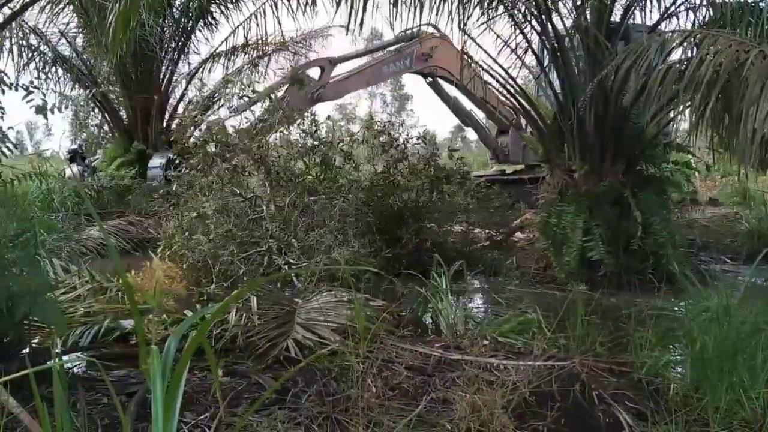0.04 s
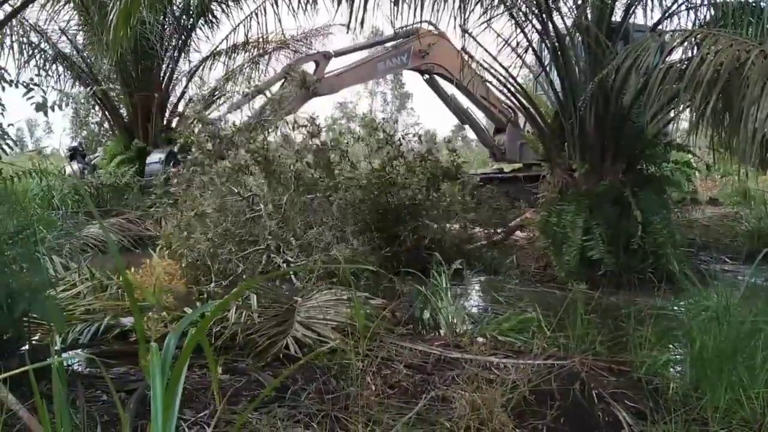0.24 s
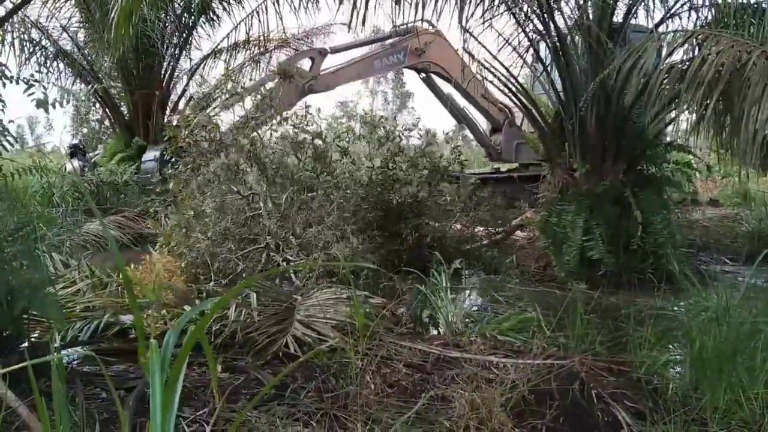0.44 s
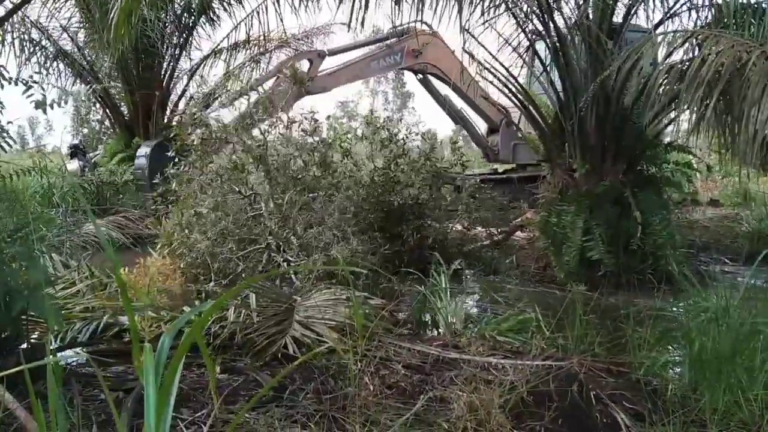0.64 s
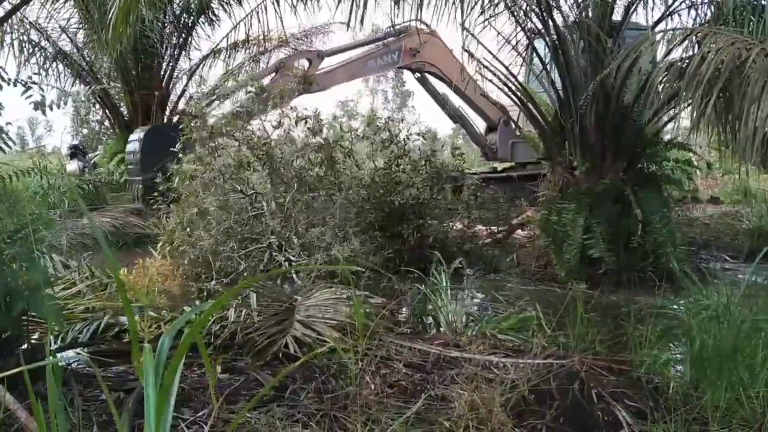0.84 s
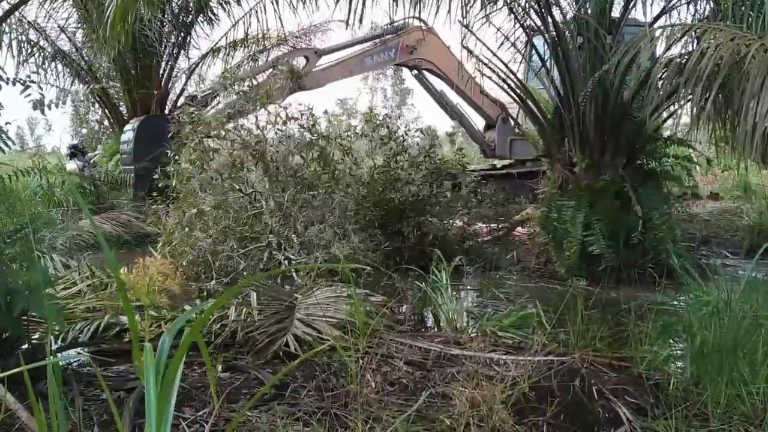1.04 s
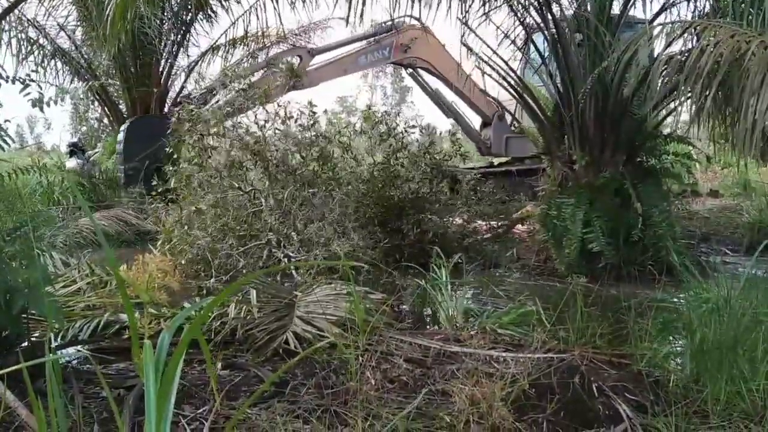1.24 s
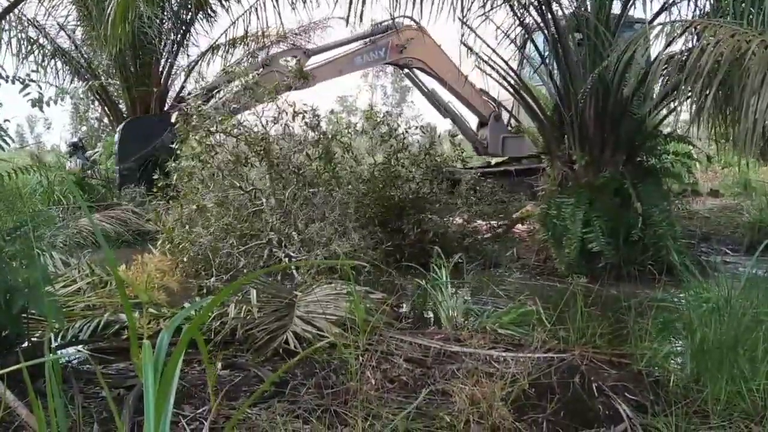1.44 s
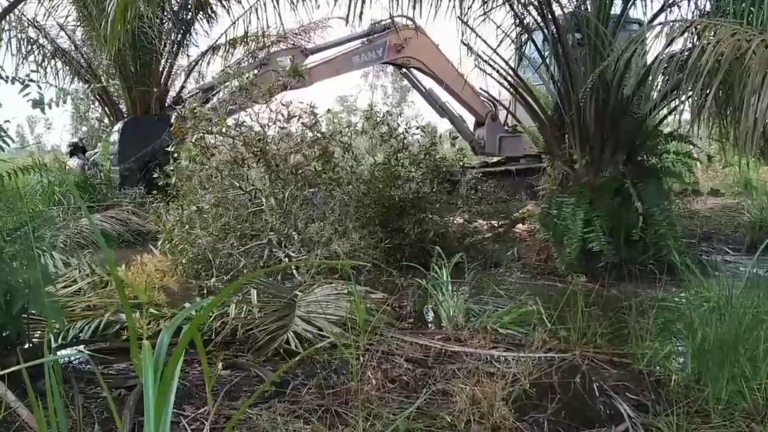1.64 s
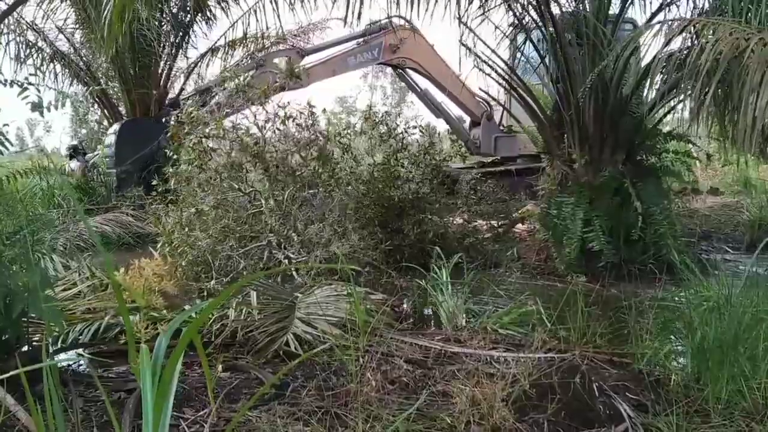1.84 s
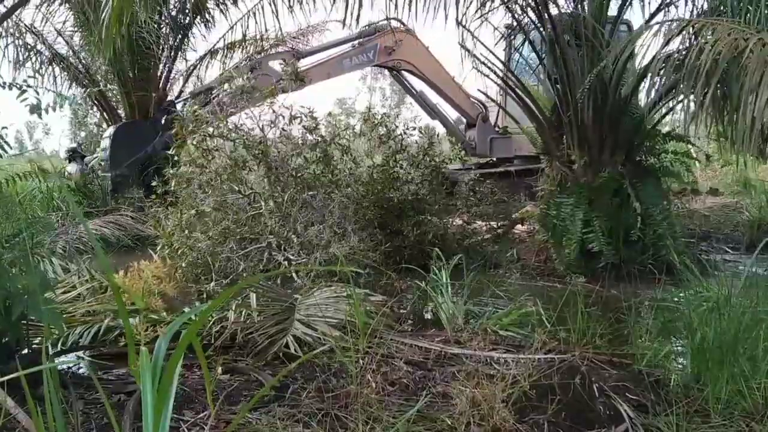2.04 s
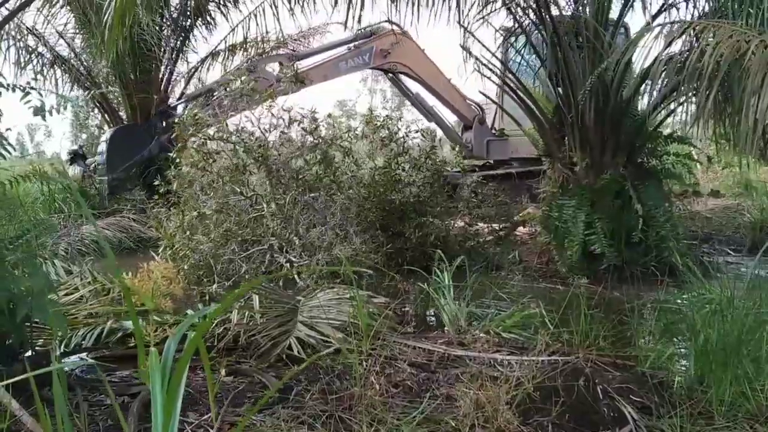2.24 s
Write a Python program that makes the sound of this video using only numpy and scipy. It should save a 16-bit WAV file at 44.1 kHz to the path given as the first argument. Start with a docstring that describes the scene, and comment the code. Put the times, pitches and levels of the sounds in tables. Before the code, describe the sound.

An excavator's steel bucket clanks and booms repeatedly over a diesel hum and hydraulic drone, some way off outdoors. Wet brush rustles and water plops, then the bucket thuds down, wood splinters and two more clanks follow.

```python
"""An excavator swings its arm over flooded ground among palms, some way off.
From the start the diesel hums, the hydraulics drone and wet brush rustles and spatters. At 0.2 s the
steel bucket and linkage begin to clank, each impact exciting their normal modes; air pockets ring in the
water, a twig snaps close by and heavy blows boom. From 0.7 s dry pins squeak. At 1.5 s the bucket lands
with a thud and wood splinters; near 1.9 s it clanks twice more as the engine takes up load."""
import sys
import numpy as np
from scipy import signal
from scipy.fft import rfft, irfft
from scipy.io import wavfile

SR = 44100
rng = np.random.default_rng(int(sys.argv[2]) if len(sys.argv) > 2 else 0)


def int16_out(signal):
    """Quantize to a 16-bit WAV file."""
    q = np.round(np.clip(np.atleast_2d(signal).T, -1, 1) * 32767)
    wavfile.write(sys.argv[1], SR, q.astype(np.int16))


N = 101429
TIME = np.arange(N) / SR
BAND_EDGES_HZ = 22 * 2 ** (np.arange(30) / 3)

# Outdoor air: (frequency [Hz], band level [dB])
AIR_SPECTRUM = [(100,-80.5),(1200,-112),(2200,-81.5),(4000,-89),(7800,-94.5),(10500,-82.5),(15000,-64)]
# Exhaust tones: (multiple of the firing rate [1], level [dB])
EXHAUST_ORDERS = [(1,-60),(2,-56.5),(3,-70),(3.5,-71.5)]
# Effect of engine load on overtones and rumble: (time [s], gain [dB])
ENGINE_LOAD = [(0,-4),(.5,-12.5),(.75,-3.5),(1.1,-7.5),(1.8,-3),(2.0,5.5),(2.15,4)]
# Engine rumble: (frequency [Hz], band level [dB])
RUMBLE_SPECTRUM = [(25,-76),(45,-71),(90,-67),(150,-59.5),(210,-87.5),(300,-75.5),(600,-90),(1500,-82.5)]
# Hydraulic drone: (time [s], level [dB])
DRONE_ENVELOPE = [(0,-44),(.15,-45.5),(.3,-33.5),(.7,-39.5),(.98,-36),(1.12,-45),(1.2,-44),(1.3,-46.5),(1.45,-41.5),(1.75,-54.5),(1.9,-32),(2.05,-40),(2.17,-42.5),(2.255,-80.5),(2.29,-37.5)]
# Its resonances: (frequency [Hz], bandwidth [Hz], relative level [dB])
HYDRAULIC_RESONANCES = [(358.6,51,-8.5),(418.7,44.5,-7.5),(448,110,-14.5),(1034,87,-20.5)]
# Rustle of wet brush: (time [s], level [dB])
BRUSH_ENVELOPE = [(0,-59.5),(.07,-61.5),(.19,-52),(.26,-46.5),(.305,-45.5),(.38,-73),(.43,-48),(.53,-58.5),(.6,-67.5),(.65,-57.5),(.87,-56),(.91,-49.5),(.95,-51.5),(1.0,-48.5),(1.16,-55),(1.27,-65.5),(1.37,-67),(1.42,-60),(1.5,-52),(1.62,-77.5),(1.8,-68),(1.9,-56),(2.07,-73.5),(2.25,-98),(2.275,-53),(2.3,-68)]
# Its colour: (frequency [Hz], relative band level [dB])
BRUSH_SPECTRUM = [(1000,-18),(2000,0.5),(3200,-1),(5000,9.5),(7800,15),(10000,8),(15000,9.5)]
# Bucket impacts: (time [s], level [dB], boom centre [Hz], then five relative levels:
# boom [dB], body [dB], clang [dB], crack [dB], sizzle [dB])
BUCKET_CLANKS = [(0.187, -33, 343, -5, -14.5, -21, -9.5, -14),
                 (0.303, -13, 425, -13.5, -0.5, -10.5, -15, -31.5),
                 (0.411, -13.5, 382, -16, -4.5, -8.5, -22, -20.5),
                 (0.456, -20, 320, -10, -10, -25, -18, -23.5),
                 (0.519, -12.5, 455, -28, -7.5, -14.5, -21.5, -39),
                 (0.655, -23, 450, -11, -2.5, -8, -28, -22), (0.683, -25, 421, -15, -13, -9.5, -9.5, -16),
                 (0.726, -31.5, 440, -16, -6.5, -3.5, -7.5, -18.5),
                 (0.819, -28.5, 383, -10.5, -5, -3.5, -11.5, -39),
                 (0.897, -28.5, 392, -2, -15.5, -4, -15, -16),
                 (1.034, -24.5, 346, -7.5, -29.5, -5, -26.5, -44),
                 (1.119, -40.5, 340, -1.5, -40.5, 4.5, -26, -40),
                 (1.343, -37, 418, 4.5, -26, -1, -13.5, -62),
                 (1.44, -41, 434, -12.5, 6.5, -2, -13.5, -21.5),
                 (1.486, -14, 311, -8, -12.5, -10.5, -16, -27),
                 (1.884, -24, 450, -14.5, -1.5, -26, -18.5, -36.5),
                 (1.923, -14, 477, -12, -11.5, -7, -26, -69)]
# Those five ranges: (centre frequency [Hz])
CLANK_RANGES_HZ = [380, 680, 1450, 2500, 4300]
# Normal modes of the bucket: (frequency [Hz], relative level [dB], T60 [s])
BUCKET_MODES = [(278.3,-2.5,1),(320,0.5,0.91),(343.3,3.5,0.97),(388.6,-3,0.93),(418,-1.5,0.98),(454.5,4,0.5),(552,-4,0.42),(619.6,-0.5,0.3),(676.7,-3.5,0.26),(1048,-3.5,0.19),(1450,-8.5,0.099),(1514,-1,0.11),(1756,0.5,0.28),(2550,-9,0.15)]
# Dense clatter of the steel: (frequency [Hz], relative band level [dB])
CLATTER_SPECTRUM = [(150,-27),(230,-25),(320,-12),(430,-8),(600,-14.5),(850,-18),(1150,-10),(1600,-7.5),(2100,-6),(2700,-5),(3500,-7.5),(5000,-13.5),(8000,-8.5),(14000,-22.5)]
# Reverberation among the trees: (frequency [Hz], T60 [s])
TREE_ECHO_T60 = [(250,1),(660,0.47),(1700,0.27),(4500,0.34),(9000,0.043)]
# Air pockets in the water: (time [s], frequency [Hz], level [dB])
AIR_POCKETS = [(0.192,980,-32),(0.325,726,-40),(0.42,610,-35),(0.533,1444,-23.5),(1.039,1518,-25.5),(1.442,1038,-35.5)]
# Breaking wood: (time [s], peak level [dB], centre frequency [Hz], decay time [s])
WOOD_SNAPS = [(.2478,-17.5,4190,0.00012),(.3055,-20.5,1790,0.0021),(0.639,-36,5270,0.005),(1.4915,-20.5,1980,0.009),(1.506,-23.5,1466,0.009),(1.514,-29,2640,0.0018),(1.523,-39,2460,.001)]
# Booms after heavy blows: (time [s], initial pitch [Hz], settled pitch [Hz], level [dB], T60 [s])
HOLLOW_BOOMS = [(.313,470.6,366,-22,0.23), (.455,367.6,295.7,-28.5,0.288), (1.048,354.6,341.2,-28,0.46),
                (1.498,375.5,309.2,-26,0.67), (1.93,464.3,322.8,-31,0.382)]
# Dry pins: (time [s], duration [s], frequency [Hz], level [dB], bandwidth over frequency [1])
PIN_SQUEAKS = [(1.114,0.092,690,-50,0.039),(1.749,.027,450,-47,0.072),(1.829,0.026,1323,-54,0.027),(1.884,0.058,8080,-54.5,.03),(2.07,.1,1364,-58,.05),(0.666,0.072,8390,-51,0.023),(2.12,.13,1098,-56.5,0.13)]
# The bucket's weight landing: (time [s], level [dB])
LANDINGS = [(1.503, -32.5)]
# Microphone response: (frequency [Hz], gain [dB])
MICROPHONE_RESPONSE = [(0,-1.5),(2750,-1),(3150,-3),(3700,-1.5),(8200,-0.5),(9000,-11.5),(9800,-11.5),(12000,-22),(15000,-22)]


def from_db(db):
    """Amplitude ratio of a level in decibels."""
    return 10 ** (np.asarray(db) / 20)


def rms_one(x):
    """Normalisation to unit rms."""
    return x / np.sqrt(np.mean(x ** 2) + 1e-20)


def in_time(rows):
    """Linear interpolation of a curve at every sample."""
    return np.interp(TIME, *np.transpose(rows))


def at_hz(points, hz):
    """Interpolation on a logarithmic frequency axis."""
    frequencies, values = np.transpose(points)
    return np.interp(np.log(hz), np.log(frequencies), values)


def drift(rate_hz):
    """Low-pass filtered noise: a slow random fluctuation of unit rms."""
    step, settling = 40, 2000  # samples
    r = np.exp(-2 * np.pi * step * rate_hz / SR)
    white = rng.standard_normal(N // step + settling + 2)
    slow = signal.lfilter([1], [1, -2 * r, r * r], white)[settling:]
    return np.interp(np.arange(N) / step, np.arange(len(slow)), rms_one(slow))


def band(x, low_hz, high_hz):
    """Band-pass filtering."""
    sections = signal.butter(3, [low_hz, min(high_hz, .45 * SR)], "band", fs=SR, output="sos")
    return signal.sosfilt(sections, x + 1e-18)


def noise_bands():
    """Third-octave analysis of white noise: (centre frequency [Hz], noise of unit rms)."""
    white = rng.standard_normal((2, N + SR // 4))
    return [(np.sqrt(low * high), rms_one(band(white[k % 2], low, high)[-N:]))
            for k, (low, high) in enumerate(zip(BAND_EDGES_HZ, BAND_EDGES_HZ[1:]))]


def resonant_noise(hz, width_hz):
    """Random forcing of two like resonators in series gives narrow-band noise."""
    r = np.exp(-np.pi * width_hz / SR)
    section = [1, 0, -1, 1, -2 * r * np.cos(2 * np.pi * hz / SR), r * r]
    return rms_one(signal.sosfilt([section, section], rng.standard_normal(N + SR // 4))[-N:])


def add(out, start_s, sound):
    """Superposition of a sound from a given time."""
    i = int(max(start_s, 0) * SR)
    out[i:i + len(sound)] += sound[:max(N - i, 0)]


def outdoor_air():
    """Stationary broadband noise forms the ambient floor."""
    return sum(from_db(at_hz(AIR_SPECTRUM, hz)) * noise for hz, noise in noise_bands())


def firing_phase(firing_hz=65.33, wander=0.004):
    """Phase is the integral of frequency, here a slightly wandering firing rate."""
    return 2 * np.pi * np.cumsum(firing_hz * (1 + wander * drift(7.4))) / SR


def diesel(phase):
    """Periodic firing radiates tones at orders of its rate; load lifts the overtones and rumble."""
    load = from_db(in_time(ENGINE_LOAD))
    hum = np.zeros(N)
    for order, db in EXHAUST_ORDERS:
        tone = np.sqrt(2) * np.sin(order * phase + rng.uniform(0, 2 * np.pi))
        hum += from_db(db) * (load if order > 1 else 1) * tone
    rumble = sum(from_db(at_hz(RUMBLE_SPECTRUM, hz)) * noise for hz, noise in noise_bands() if hz < 1600)
    return hum + load * rumble


def hydraulics(phase, throb_depth=0.15):
    """Noise-driven resonances drone, amplitude-modulated at the firing rate."""
    drone = sum(from_db(db) * resonant_noise(hz, width) for hz, width, db in HYDRAULIC_RESONANCES)
    return drone * from_db(in_time(DRONE_ENVELOPE)) * (1 + throb_depth * np.sin(phase))


def wet_brush(ticks_per_s=900, tick_db=-5, full_contact_db=-53.5, thin_below_hz=5620):
    """Shot noise of leaves and droplets over a hiss; lighter contact loses the lower bands."""
    ticks = (rng.random(N) < ticks_per_s / SR) * rng.choice([-1, 1], N)
    ticks = ticks * from_db(2.5 * np.minimum(rng.exponential(1, N), 5))  # uneven strengths
    out, level_db = np.zeros(N), in_time(BRUSH_ENVELOPE)
    for (hz, hiss), low, high in zip(noise_bands(), BAND_EDGES_HZ, BAND_EDGES_HZ[1:]):
        if hz > 900:
            thinning_db = (level_db - full_contact_db) / (1 + (hz / thin_below_hz) ** 10)
            patchy_db = 2.5 * drift(4.7)
            spatter = from_db(tick_db) * rms_one(band(ticks, low, high))
            out += from_db(at_hz(BRUSH_SPECTRUM, hz) + thinning_db + patchy_db) * (hiss + spatter)
    flutter_db = 2.5 * drift(54)
    return rms_one(out) * from_db(level_db + flutter_db)


def clank_db(clank, hz):
    """Excitation spectrum of an impact: the point of contact selects which low modes boom."""
    _, db, boom_hz, *colour = clank
    boom_width_oct = 0.31
    off_centre_db = min(3 * (np.log2(hz / boom_hz) / boom_width_oct) ** 2, 9) if hz < 500 else 0
    return db + at_hz(list(zip(CLANK_RANGES_HZ, colour)), hz) - off_centre_db


def rise_time_s(clank, hard_rise_s=0.003536, hard_hit_db=-14.5, doubling_db=10):
    """The softer a contact, the more slowly its force builds."""
    return hard_rise_s * 2 ** ((hard_hit_db - clank[1]) / doubling_db)


def plate_lag_s(hz):
    """Large plates respond late at low frequencies."""
    return 0.00848 / (1 + (hz / 450) ** 2)


def bucket_ring(ring_db=-12.5, scatter_db=8):
    """Free vibration: every impact excites each damped mode with a strength of its own."""
    out = np.zeros(N)
    for hz, mode_db, t60 in BUCKET_MODES:
        strikes = np.zeros(N)
        for clank in BUCKET_CLANKS:
            lateness, strength = rng.uniform(-1, 1, 2)
            start_s = clank[0] + plate_lag_s(hz) + lateness * rise_time_s(clank) / 2
            strike_db = ring_db + mode_db + clank_db(clank, hz) + scatter_db * strength
            add(strikes, start_s, from_db([strike_db]))
        r, w = from_db(-60 / (t60 * SR)), 2 * np.pi * hz / SR
        ring = signal.lfilter([.5, 0, -.5], [1, -2 * r * np.cos(w), r * r], strikes + 1e-18)
        out += band(ring, hz / np.sqrt(2), hz * np.sqrt(2))
    return out


def contact_resonances(x, count=22, low_hz=700, high_hz=7000, q=18, depth_db=7):
    """Each contact stirs its own series of alternating resonances and antiresonances."""
    for slot, offset in enumerate(rng.random(count)):
        hz = low_hz * (high_hz / low_hz) ** ((slot + offset) / count)
        w, a = 2 * np.pi * hz / SR, from_db(depth_db * (-1) ** slot / 2)
        k, middle = np.sin(w) / (2 * q), -2 * np.cos(w)
        x = signal.lfilter([1 + k * a, middle, 1 - k * a], [1 + k / a, middle, 1 - k / a], x)
    return x


def bucket_clatter(contact_s=0.006, decay_s=0.021, clatter_db=-5.5, echo_db=-2, grain_db=2):
    """A grinding contact and its echo from the trees add in power; the treble echo dies sooner."""
    out, t = np.zeros(N), TIME[:SR // 2]
    grain = rms_one(from_db(grain_db * drift(210)))
    bands = [(hz, noise) for hz, noise in noise_bands() if hz > 120]
    echo_rise = np.minimum(t / contact_s, 1)
    echoes = [echo_rise * from_db(echo_db - 60 * t / at_hz(TREE_ECHO_T60, hz)) for hz, _ in bands]
    release = np.exp(-np.maximum(t - contact_s, 0) / decay_s)
    for clank in BUCKET_CLANKS:
        span = (int(clank[0] * SR) + np.arange(len(t))) % N
        contact = np.minimum(t / rise_time_s(clank), 1) * release * grain[span]
        clatter = np.zeros(len(t))
        for (hz, noise), echo in zip(bands, echoes):
            lag = int(plate_lag_s(hz) * SR)
            gain = from_db(clatter_db + at_hz(CLATTER_SPECTRUM, hz) + clank_db(clank, hz))
            clatter[lag:] += (gain * noise[span] * np.hypot(contact, echo))[:len(t) - lag]
        add(out, clank[0], contact_resonances(clatter))
    return out


def water_plops(rise_s=0.0046, t60=0.069):
    """Bubble resonance: a pocket of air in water rings as a damped oscillator."""
    out, t = np.zeros(N), TIME[:SR // 4]
    for start_s, hz, db in AIR_POCKETS:
        envelope = from_db(db - 60 * t / t60) * np.minimum(t / rise_s, 1)
        add(out, start_s, envelope * np.sin(2 * np.pi * hz * t))
    return out


def twig_snaps(edge_ratio=1.49, tail_db=-21.5, tail_s=0.008):
    """Fracture radiates a noise burst with a faint tail; thicker wood breaks lower and longer."""
    out, t = np.zeros(N), TIME[:SR // 10]
    for start_s, db, hz, decay_s in WOOD_SNAPS:
        envelope = np.exp(-t / decay_s) + from_db(tail_db) * np.exp(-t / tail_s)
        snap = band(rng.standard_normal(len(t)) * envelope, hz / edge_ratio, hz * edge_ratio)
        add(out, start_s, from_db(db) * snap / np.abs(snap).max())
    return out


def bucket_booms(sag_share=0.1028, rise_s=0.0087, waver_db=3, waver_hz=35):
    """A heavy blow leaves a damped tone that sags in pitch; interfering reflections make it waver."""
    out, t = np.zeros(N), TIME[:SR]
    for start_s, start_hz, settled_hz, db, t60 in HOLLOW_BOOMS:
        hz = settled_hz + (start_hz - settled_hz) * np.exp(-t / (sag_share * t60))
        level_db = db - 60 * t / t60 + waver_db * drift(waver_hz)[:SR]
        envelope = from_db(level_db) * np.minimum(t / rise_s, 1)
        add(out, start_s, envelope * np.sin(2 * np.pi * np.cumsum(hz) / SR))
    return out


def pin_squeaks():
    """Dry friction in a joint briefly drives a narrow resonance."""
    out = np.zeros(N)
    for start_s, length_s, hz, db, relative_width in PIN_SQUEAKS:
        progress = np.clip((TIME - start_s) / length_s, 0, 1)
        swell = np.sqrt(np.abs(np.sin(np.pi * progress)))
        out += from_db(db) * swell * resonant_noise(hz, relative_width * hz)
    return out


def landing_thud(hz=171, t60=0.068):
    """The bucket's weight lands and excites a low, quickly damped oscillation."""
    out, t = np.zeros(N), TIME[:SR // 2]
    for start_s, db in LANDINGS:
        add(out, start_s, from_db(db - 60 * t / t60) * np.sin(2 * np.pi * hz * t))
    return band(out, hz / np.sqrt(2), 2 * hz)


def scene():
    """Linear superposition: the pressures of all sources add in one channel."""
    air = outdoor_air()
    steel = bucket_ring() + bucket_clatter() + bucket_booms() + pin_squeaks() + landing_thud()
    ground = water_plops() + twig_snaps() + wet_brush()
    phase = firing_phase()
    return (air + diesel(phase) + hydraulics(phase) + ground + steel)[None]


def record(dry, stopband_hz=16000):
    """Low-pass response: the microphone loses most of the top octave, and the very top is cut."""
    hz = np.arange(N + 1) * SR / (2 * N)
    response = from_db(np.interp(hz, *np.transpose(MICROPHONE_RESPONSE)))
    dull = irfft(rfft(dry, 2 * N) * response)[:, :N]
    return signal.sosfilt(signal.cheby2(14, 60, stopband_hz, fs=SR, output="sos"), dull)


dry = scene()
out = record(dry)
int16_out(out)
```